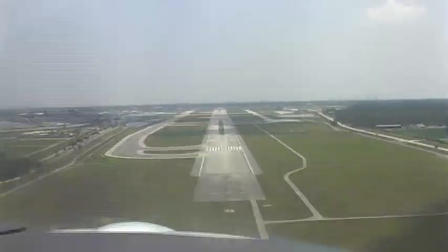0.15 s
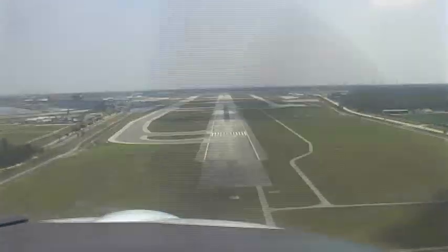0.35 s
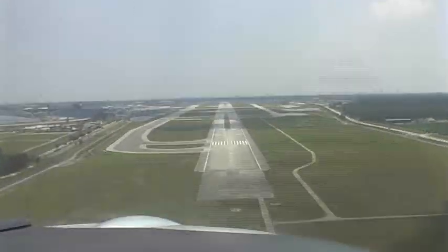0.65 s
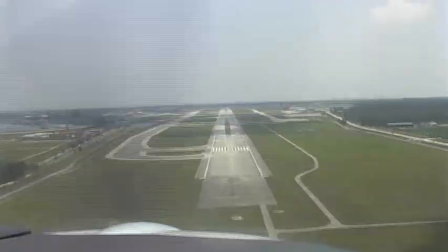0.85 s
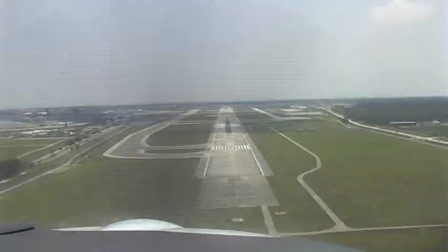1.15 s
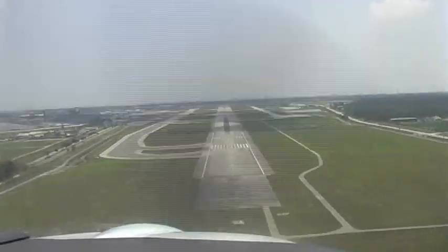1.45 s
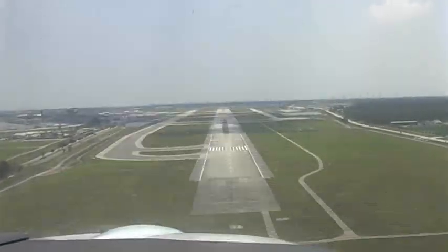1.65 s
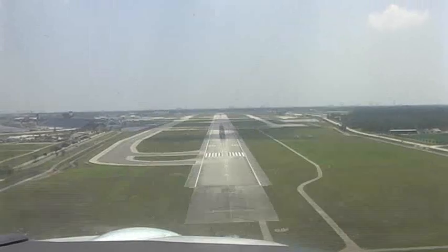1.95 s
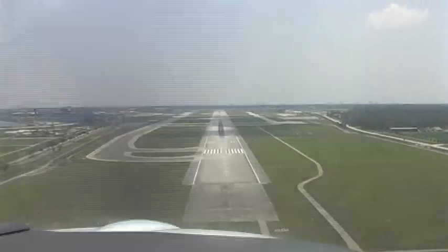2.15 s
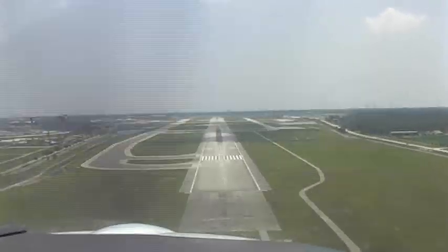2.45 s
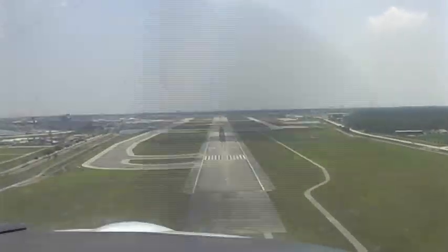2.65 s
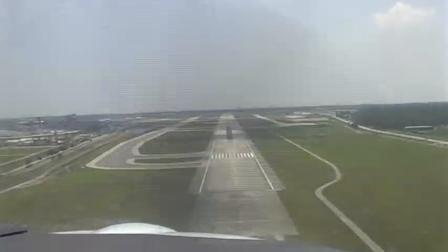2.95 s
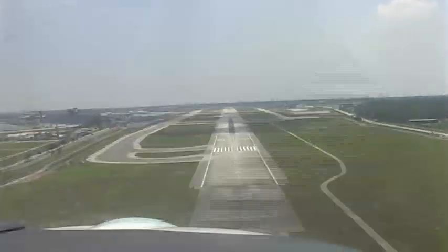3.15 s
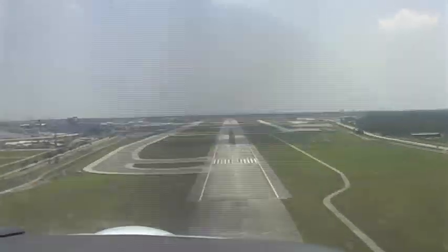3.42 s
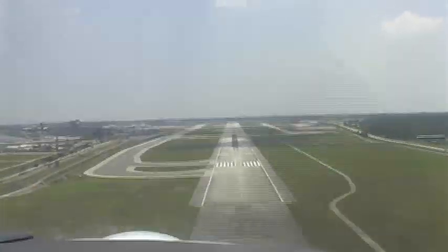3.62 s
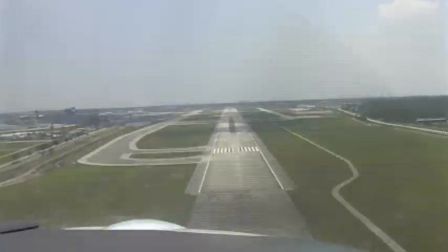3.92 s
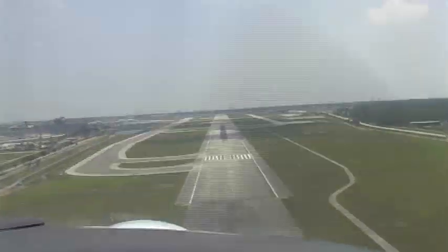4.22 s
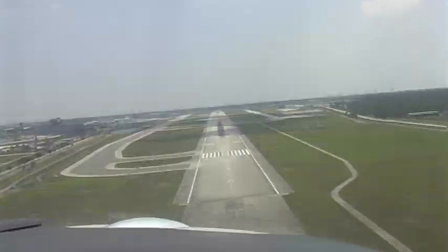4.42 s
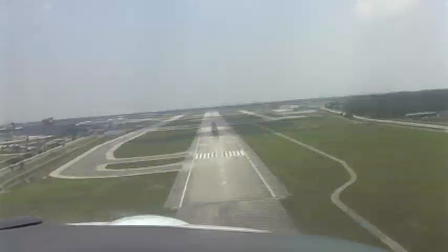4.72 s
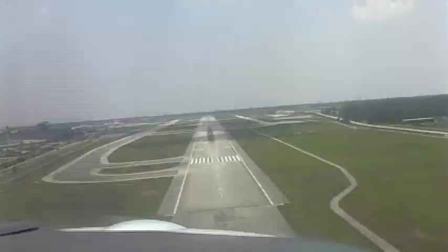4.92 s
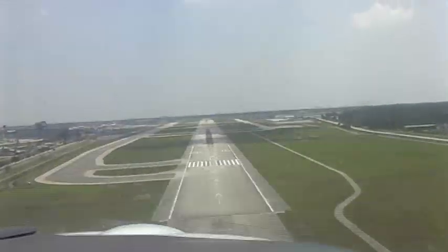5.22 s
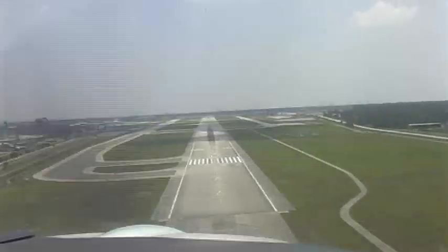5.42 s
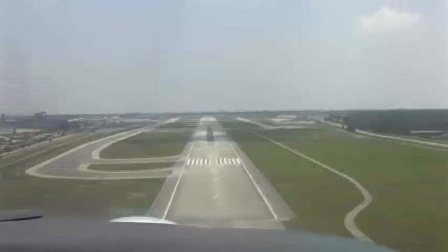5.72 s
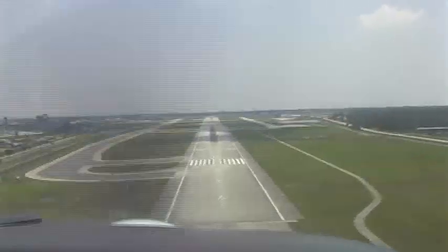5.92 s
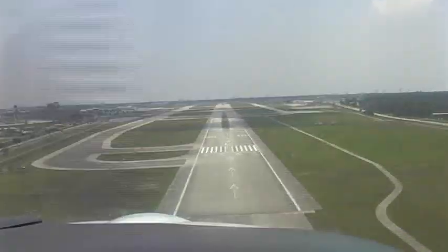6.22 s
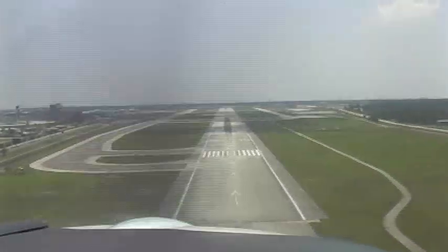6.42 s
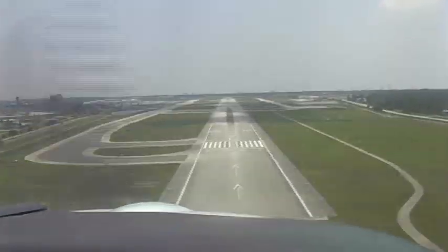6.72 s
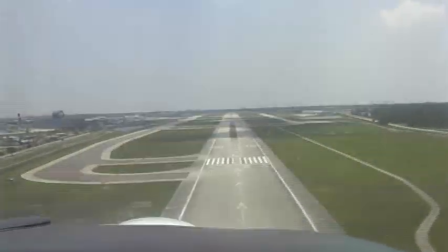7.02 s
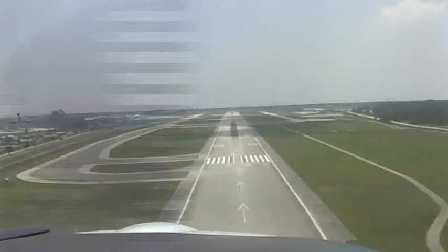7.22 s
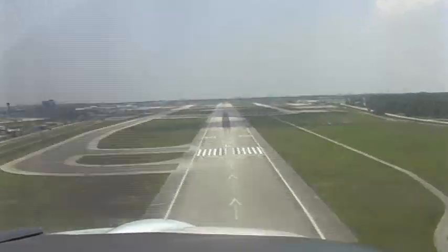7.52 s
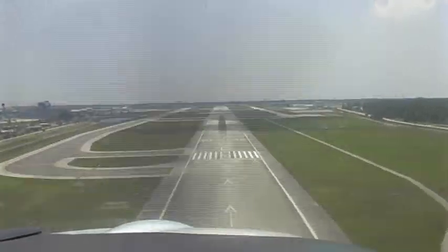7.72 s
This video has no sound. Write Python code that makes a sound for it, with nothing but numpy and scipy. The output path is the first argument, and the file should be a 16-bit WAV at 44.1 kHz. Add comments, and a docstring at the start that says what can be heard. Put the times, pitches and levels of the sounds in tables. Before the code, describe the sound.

Inside a light plane approaching a runway, the low, even engine and propeller drone sits beneath a wash of slipstream and faint whistling.

```python
"""A deep, steady drone fills the cabin of a light aircraft on final approach: a four-cylinder engine and
its two-blade propeller beat at one rate, and uneven cylinders add weak lines between the harmonics.
Slipstream roars through the skin, rings a few panels and swells in gusts. Behind it, air across a gap
whistles on and off, a higher hiss sings and fades, and a low hum sounds once.
Heard from inside the cabin, on the two microphones of a small stereo camera behind the windscreen."""
import sys
import numpy as np
from scipy import signal
from scipy.fft import rfft, irfft, next_fast_len
from scipy.io import wavfile
from scipy.ndimage import uniform_filter1d

SR = 44100
rng = np.random.default_rng(int(sys.argv[2]) if len(sys.argv) > 2 else 0)


def int16_out(signal):
    """Quantize to a 16-bit WAV file."""
    q = np.round(np.clip(np.atleast_2d(signal).T, -1, 1) * 32767)
    wavfile.write(sys.argv[1], SR, q.astype(np.int16))


N = 346626
TIME = np.arange(N) / SR
FFT_SIZE = next_fast_len(N)
BIN_HZ = np.maximum(np.fft.rfftfreq(FFT_SIZE, 1 / SR), 1)
SIDES = np.array([[1], [-1]])  # left and right microphone; pan_db is left minus right


def undb(db):
    """Gain of a level in dB."""
    return 10 ** (np.asarray(db) / 20)


def curves(table):
    """Each column after the time, interpolated sample by sample."""
    time_s, *columns = np.transpose(table)
    return [np.interp(TIME, time_s, column) for column in columns]


def walk(rate_hz):
    """Smooth random drift with a spread of 1, taking rate_hz steps a second."""
    hold = 32
    steps = np.repeat(rng.standard_normal(int(N / SR * rate_hz) + 2), hold)
    drift = uniform_filter1d(uniform_filter1d(steps, hold), hold)
    return np.interp(TIME * rate_hz * hold, np.arange(len(drift)), drift / drift.std())


def white():
    """Spectrum of white noise at 0 dB per Hz."""
    return rfft(rng.standard_normal(FFT_SIZE)) * np.sqrt(SR / 2)


def colour(hz, db):
    """Levels interpolated to every bin along log frequency."""
    return np.interp(np.log(BIN_HZ), np.log(hz), db)


def resonance(centre_hz, width_hz):
    """Bell-shaped peak of height 1 across the bins."""
    return 1 / (1 + (2 * (BIN_HZ - centre_hz) / width_hz) ** 2)


def tone(phase, level_db, pan_db=0, left_lead_rad=0):
    """One sine as it reaches the two microphones."""
    return np.sqrt(2) * undb(level_db + SIDES * pan_db / 2) * np.cos(phase + SIDES * left_lead_rad / 2)


# A brief hum in the cabin, dead centre: time_s, pitch_hz, level_db
HUM_CONTOUR = [(.26, 432, -60), (.36, 434, -33), (.46, 438, -37), (.56, 438, -33), (.72, 424, -31),
               (.8, 420, -36), (.88, 418, -70)]

def cabin_hum():
    """One soft, unsteady tone that sags in pitch."""
    pitch_hz, level_db = curves(HUM_CONTOUR)
    return tone(2 * np.pi * np.cumsum(pitch_hz) / SR, level_db + 1.2 * walk(14))


# A thin hiss fading in the background, dead centre: time_s, level_db
HISS_FADE = [(0, -46), (1.2, -48), (2.0, -49.5), (2.5, -48), (3.4, -48.5), (4.5, -53), (7.86, -56)]

def singing_hiss():
    """Noise sings in one narrow resonance."""
    band = irfft(white() * resonance(centre_hz=1853, width_hz=60), FFT_SIZE)[:N]
    return band / band.std() * undb(curves(HISS_FADE)[0]) * np.ones((2, 1))


# Spells of whistling, a little to the left: start_s, length_s, level_db
WHISTLE_SPELLS = [(0.248, 0.61, -40.5), (2.95, 1.15, -38), (5.5, 0.79, -46), (6.8, 0.75, -37),
                  (7.55, .5, -38)]

def gap_whistle():
    """Air across a gap: a tone that wavers in pitch and strength, faint between its spells."""
    fade_s, faint_db = 0.32, -47.5
    pitch_hz = 835 + 3.2 * walk(9)
    phase = 2 * np.pi * np.cumsum(pitch_hz) / SR
    level_db = faint_db
    for start_s, length_s, spell_db in WHISTLE_SPELLS:
        inside_s = np.minimum(TIME - start_s, start_s + length_s - TIME)
        swell = np.clip(inside_s / fade_s + .5, 0, 1)
        level_db = np.maximum(level_db, faint_db + swell * (spell_db - faint_db))
    return tone(phase, level_db + 2.6 * walk(16), pan_db=1.4, left_lead_rad=.1)


# Airflow through the skin, common to both microphones: frequency_hz, density_db_per_hz, pan_db
SKIN_ROAR = [(14, -69, 0), (60, -51.5, 1), (131, -42, 1), (228, -44, -0.5), (408, -56, -1.5),
             (558, -57.5, 1.5), (760, -58, 2.5), (1127, -64.5, -0.5), (1630, -67, 2.5), (2430, -70.5, .3),
             (4470, -74.5, -.5), (8800, -83, 0), (12000, -90, -.2), (15700, -100, -.3)]
# Turbulence that differs between the microphones: frequency_hz, density_db_per_hz
SIDE_TURBULENCE = [(15, -78), (60, -66), (130, -67), (260, -68), (360, -67.5), (740, -69), (950, -74),
                   (1400, -77), (1600, -74), (2700, -76.5), (4500, -84.8), (6000, -88.8), (10500, -92.7),
                   (13000, -95.6), (15400, -110)]
# Panels and cavities around the cabin: centre_hz, width_hz, gain_db
CABIN_RESONANCES = [(436, 46, 5), (468.4, 24, 5), (184, 17, -3.5), (261, 24, -2.5), (395, 23, -1),
                    (770, 52, -3), (1520, 110, -1), (855, 82, 3.5), (981, 47, 3.5), (1336, 180, 4),
                    (1870, 63, 4), (1985, 81, 4.5), (2154, 63, 3), (2680, 51, 3), (2823, 66, 6),
                    (3074, 40, 4), (3340, 86, 3)]

def roar_spectrum():
    """Steady stereo air noise, coloured by the panels and cavities it rings."""
    hz, density_db, pan_db = np.transpose(SKIN_ROAR)
    ring_db = sum(db * resonance(centre, width) for centre, width, db in CABIN_RESONANCES)
    common = white() * undb(colour(hz, density_db) + ring_db + SIDES * colour(hz, pan_db) / 2)
    side = white() * undb(colour(*np.transpose(SIDE_TURBULENCE)) + .2 * ring_db)
    return common + SIDES * side


# Gusts as heard behind the windscreen: time_s, roar_change_db, hiss_change_db
GUSTS = [(0, -1, -0.5), (.33, 1.4, 0), (.6, 0.4, .8), (.8, .4, -.4), (1.0, 0.2, -.3), (1.72, 1, 1),
         (2.0, 0, -1), (2.56, 0.1, .4), (2.8, 0.6, .4), (3.05, -.5, -0.5), (3.33, -1.5, -0.8),
         (3.68, 0.7, .4), (4.0, 0.3, 0), (4.6, 0.8, .3), (4.7, 1.6, .6), (4.82, 4, 2.5), (4.89, -1, -1),
         (5.1, 1, 0.5), (5.23, 0.3, -0.5), (5.5, 1.3, 1), (5.7, 1.6, -0.5), (5.85, 0, .8), (6.05, 0, -1),
         (6.35, .5, 0.5), (6.55, 1, 0.2), (7.27, 0.1, 0), (7.46, -1, -1.2), (7.72, 0.5, 0), (7.86, 0, 0.5)]

def slipstream(blade_phase):
    """Bands of roar that follow the gusts, flicker alone and throb with each passing blade."""
    spectrum = roar_spectrum()
    roar_db, hiss_db = curves(GUSTS)
    roar_db += .43 * walk(7)
    hiss_db += .2 * walk(7)
    throb_db = -.4 * np.cos(blade_phase) + .15 * np.cos(2 * blade_phase - 2)
    flutter_db = .43 * walk(22)
    roar = 0
    for centre_hz in 22 * 2 ** np.arange(0, 10.5, 2 / 3):  # bands 2/3 octave apart
        offset = np.clip(1.5 * np.log2(np.maximum(BIN_HZ, 22) / centre_hz), -1, 1)
        band = irfft(spectrum * np.cos(offset * np.pi / 2) ** 2, FFT_SIZE)[:, :N]
        follow = np.clip(np.log2(centre_hz / 200) / 2, 0, 1)  # the bass hardly follows gusts or blades
        hiss_share = np.clip(np.log2(centre_hz / 2800), 0, 1)
        gust_db = (1 - hiss_share) * roar_db + hiss_share * hiss_db
        flicker_db = (.12 + .3 * hiss_share) * walk(16)
        roar += band * undb(follow * (gust_db + throb_db + flutter_db) + flicker_db)
    return roar


# Engine and propeller, close ahead of the cabin: time_s, firing_hz, first_partial_db, second_partial_db
ENGINE_RUN = [(0, 67.3, -18, -22.5), (.45, 67.42, -18, -21), (.95, 67.2, -18, -19.5),
              (1.4, 67.02, -18, -20.5), (2.6, 66.42, -16.5, -19), (3.5, 66.37, -17.6, -19),
              (4.3, 66.38, -18, -17.3), (4.65, 66.4, -17, -20), (4.95, 66.4, -17, -17.5),
              (5.3, 66.18, -16.5, -19), (5.9, 66.37, -16, -20), (6.6, 65.95, -18, -18.5),
              (7.35, 66.14, -17, -16), (7.86, 66.7, -18, -23)]
# The drone's weaker lines at the microphones: firing_multiple, base_level_db, pan_db, left_lead_rad
ENGINE_LINES = [(1.25, -33, -.6, -.07), (1.75, -38.5, -.6, -.09), (2.25, -43, 0, 0), (2.5, -34.5, .3, 0),
                (2.75, -43, -3, .5), (3, -34.5, -6.5, -.44), (3.5, -43, 0, 0), (4, -26.8, -.7, .04),
                (4.25, -40.5, 0, .07), (4.5, -40, 0, .04), (5, -32.5, -3.5, -.1), (5.25, -40, -.5, -.04),
                (5.5, -43, -1.7, .06), (5.75, -45.5, -1.2, .11), (6.5, -46.5, 2.3, 0), (7, -46, 0, 0),
                (8, -48.5, 2.6, .23), (9.25, -51, 1.7, .2)]

def engine_and_propeller():
    """The drone of firings and blades, and its phase; weak lines waver as the cylinders' shares shift."""
    firing_hz, first_db, second_db = curves(ENGINE_RUN)
    phase = 2 * np.pi * np.cumsum(firing_hz) / SR
    lean_rad = .6  # upper partials crest early, so each thump is lopsided
    drone = tone(phase, first_db + .42 * walk(12), left_lead_rad=-.19)
    drone += tone(2 * phase + lean_rad, second_db + .9 * walk(6.8))
    speed_db = firing_hz - firing_hz.mean()  # weak lines fade 1 dB per Hz as the engine slows
    for multiple, base_db, pan_db, left_lead_rad in ENGINE_LINES:
        between = multiple % 1 > 0  # lines between harmonics waver most and crest off the firing
        waver = 1 if between else .4
        lag_rad = rng.uniform(0, 2 * np.pi) * between
        lag_rad -= np.pi / 2 * np.sin(multiple * np.pi / 2)  # odd harmonics: late and early in turn
        line_phase = multiple * phase + lean_rad - lag_rad + .31 * waver * walk(3.03)
        line_db = base_db + speed_db + 1.65 * waver * walk(2.02)
        drone += tone(line_phase, line_db, pan_db, left_lead_rad)
    buzz = tone(16 * phase + .51 * walk(8), level_db=-49.5, left_lead_rad=.7)
    return drone + buzz, phase


def scene():
    """The cabin from behind the windscreen; drone and slipstream throb at one rate."""
    drone, blade_phase = engine_and_propeller()
    return drone + slipstream(blade_phase) + gap_whistle() + singing_hiss() + cabin_hum()


def record(dry):
    """The camera cuts the top treble steeply."""
    top_hz = 15500
    lowpass = signal.ellip(10, .2, 80, top_hz, fs=SR, output="sos")
    settled = signal.sosfilt_zi(lowpass)[:, None] * dry[:, :1]  # no click at the start
    return signal.sosfilt(lowpass, dry, zi=settled)[0]


dry = scene()
out = record(dry)
int16_out(out)
```